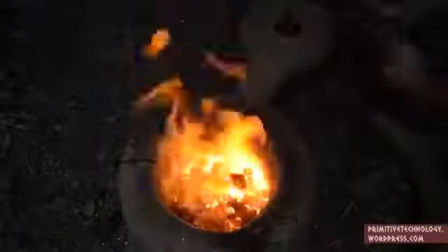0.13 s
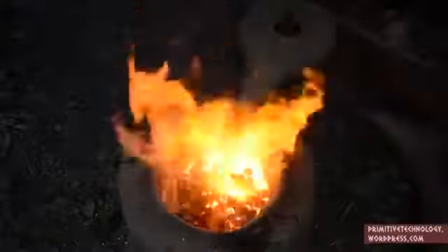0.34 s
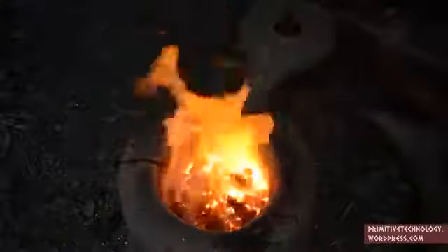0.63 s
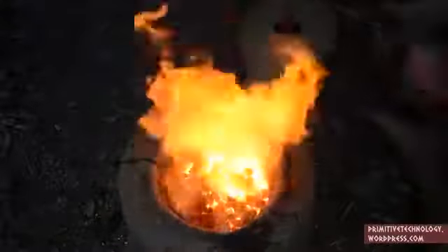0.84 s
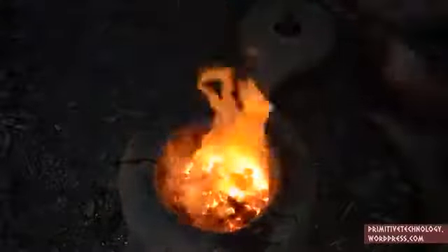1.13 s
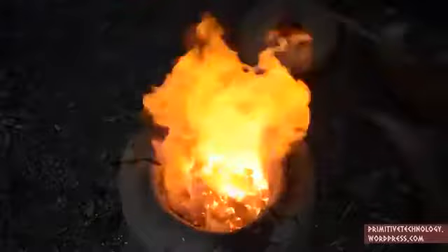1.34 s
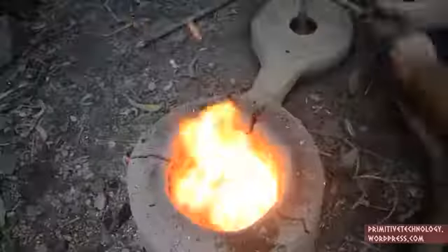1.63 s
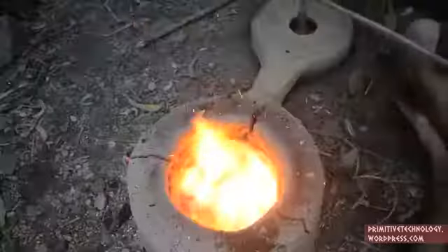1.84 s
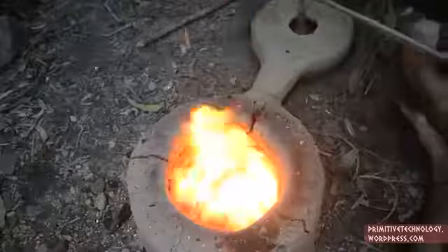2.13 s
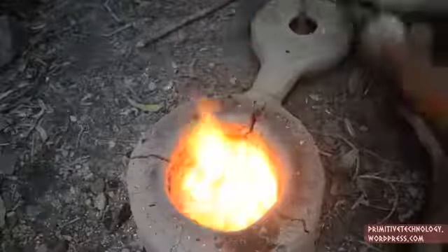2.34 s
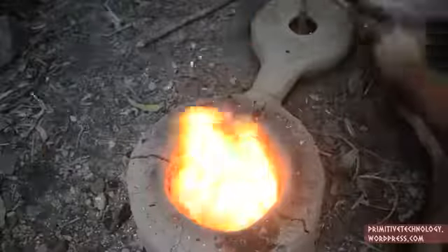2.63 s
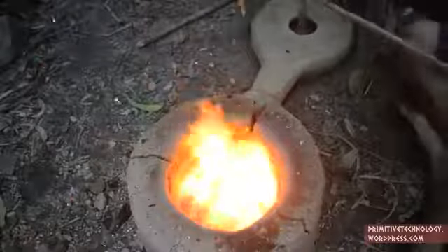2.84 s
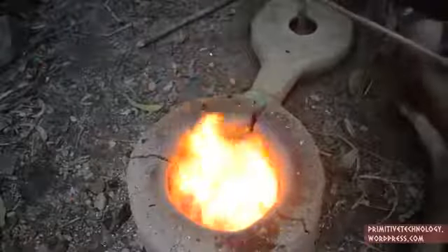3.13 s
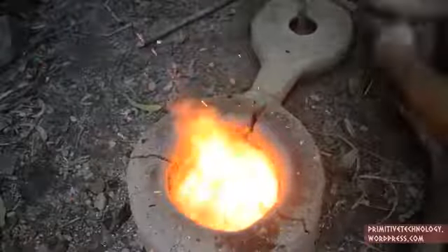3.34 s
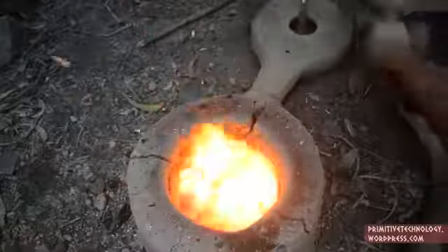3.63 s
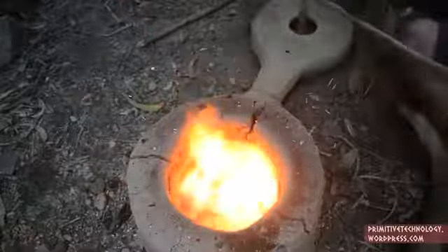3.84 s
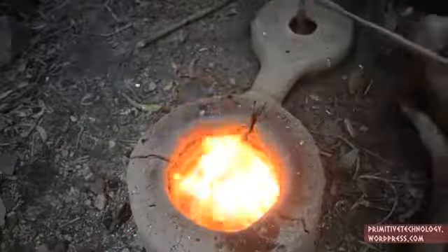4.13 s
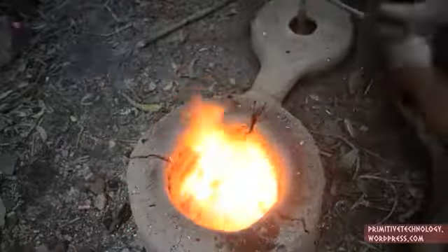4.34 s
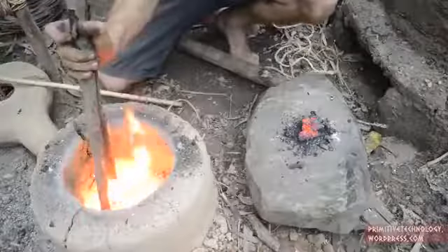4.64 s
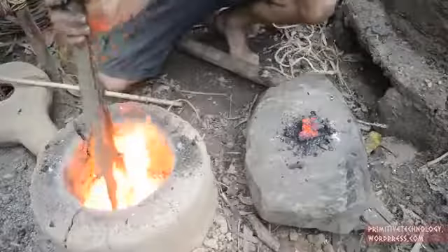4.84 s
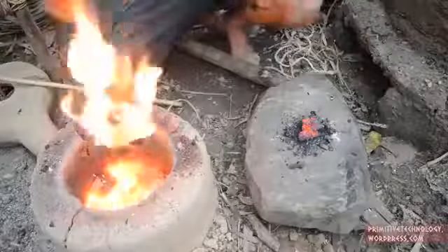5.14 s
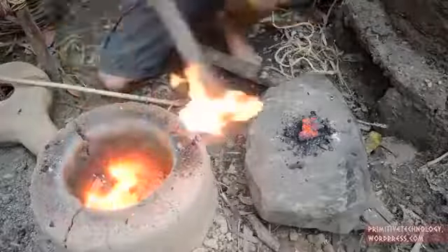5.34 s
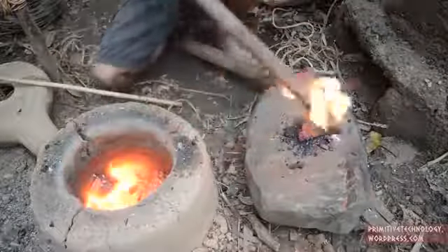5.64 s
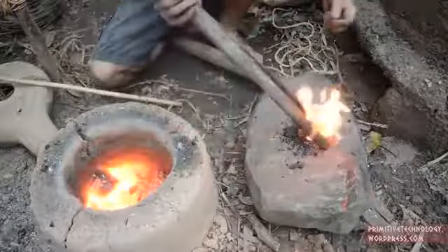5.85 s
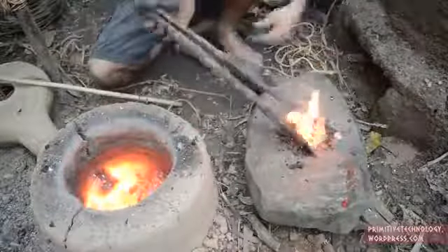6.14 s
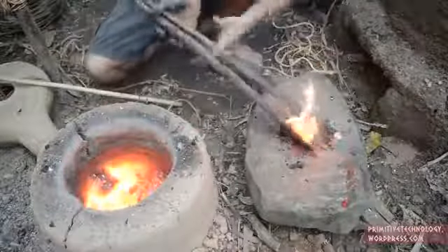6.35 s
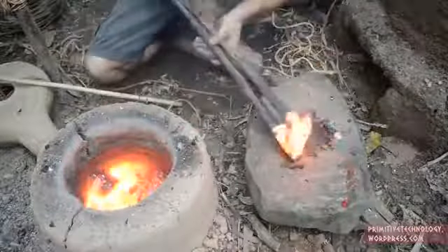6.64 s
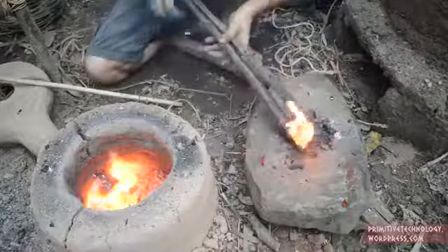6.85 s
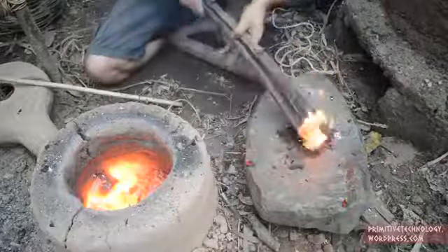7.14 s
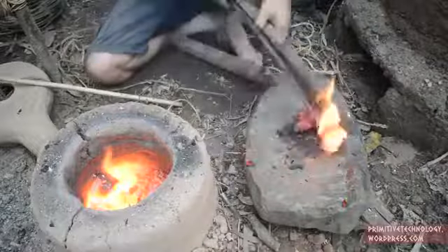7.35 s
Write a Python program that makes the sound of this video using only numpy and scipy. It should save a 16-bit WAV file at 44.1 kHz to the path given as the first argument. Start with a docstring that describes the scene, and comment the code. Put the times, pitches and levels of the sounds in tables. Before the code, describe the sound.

Low, fluttering gusts of furnace fire swell and drop with each back-and-forth stroke of a blower, its dry spindle rubbing, ticking and occasionally squeaking. The scene abruptly changes to a much quieter one: faint ember fizz and flame flutter, a sharp knock on stone, then glassy crackles and crunches as tongs work the lump. Faint open air lies beneath, with a short bird chirp at the end; close, dry outdoor sound.

```python
"""Outdoors, one microphone. From the start a bow spins the rotor of a clay blower back and forth: each stroke
swells shaped noise into the roar of a charcoal furnace, grit ringing the spindle makes rubs, scuffs and ticks,
and harmonic stacks make the cord squeak. At 4.626 s the scene changes: fizzing embers, and wooden tongs lift a
glowing lump onto a stone, with crunches of ringing fragments and knocks of decaying sines. Near the end a bird
chirps once, a gliding sine with echoes. Faint air noise lies under both scenes."""
import sys
import numpy as np
from scipy import signal
from scipy.fft import rfft, irfft
from scipy.io import wavfile
from scipy.ndimage import uniform_filter1d

SR = 44100
rng = np.random.default_rng(int(sys.argv[2]) if len(sys.argv) > 2 else 0)


def generate_wav(signal):
    """Clip the signal to [-1, 1] and save it as 16-bit WAV at the path in sys.argv[1]."""
    frames = np.transpose(np.atleast_2d(signal))
    scaled = np.clip(frames, -1, 1) * 32767
    pcm = np.round(scaled).astype(np.int16)
    wavfile.write(sys.argv[1], SR, pcm)


N = 330750
T = np.arange(N) / SR  # s


def gain_of(db):
    """Amplitude factor of a level in dB."""
    return 10 ** (np.asarray(db) / 20)


def evened(x):
    """Scales a sound to an RMS of one."""
    return x / np.sqrt(np.mean(x ** 2) + 1e-20)


def add(mix, s, sound):
    """Lays a sound into the mix at a time in seconds."""
    part = mix[round(s * SR):][:len(sound)]
    part += sound[:len(part)]


def coloured(x, points):
    """Gives a full-length sound a spectrum, silent outside its ends, and an RMS of one."""
    f, db = np.transpose(points)
    hz = np.fft.rfftfreq(N, 1 / SR)
    shape_db = np.interp(np.log(hz + 1), np.log(f), db, -100, -100)
    return evened(irfft(rfft(x) * gain_of(shape_db), N))


def lumpy_gain(lump_s, depth_db):
    """A gain that jumps about in lumps of about the given length."""
    size = round(lump_s * SR)
    smooth = uniform_filter1d(uniform_filter1d(rng.standard_normal(N), size), size)
    return gain_of(depth_db * evened(smooth))


def lumpy(lump_s, depth_db):
    """Noise whose level jumps about in lumps."""
    return rng.standard_normal(N) * lumpy_gain(lump_s, depth_db)


def grains(per_s, spread_db, share):
    """Noise mixed with a share of sparse clicks of uneven size."""
    size = np.minimum(rng.exponential(1, N), 2.5)
    struck = rng.random(N) < per_s / SR
    clicks = gain_of(spread_db * size) * rng.choice([-1, 1], N) * struck
    return share * evened(clicks) + (1 - share) * rng.standard_normal(N)


def chips(share, cycles):
    """Grit: plain noise plus small fragments, each ringing for a few cycles at its own pitch."""
    out, t, count = np.zeros(N + 300), T[:300], 16000
    at, pitch, size = rng.random((count, 3)).T
    hz = 1500 * 9.5 ** pitch[:, None]  # 1500 to 14250 Hz
    rings = np.sin(2 * np.pi * hz * t) * np.exp(-t * hz / cycles) * t * hz * hz / SR
    rings *= gain_of(6.6 * np.minimum(-np.log(1 - size), 2.5))[:, None]  # few big, many small
    np.add.at(out, (at * N).astype(int)[:, None] + np.arange(len(t)), rings)
    return share * evened(out[:N]) + (1 - share) * rng.standard_normal(N)


def resonate(x, hz, width):
    """A fixed resonance."""
    return signal.lfilter(*signal.iirpeak(hz, hz / width, SR), x)


def echoing(x, samples, first_db, t60):
    """Adds a scattered echo tail that dies by 60 dB in t60 seconds."""
    echoes = rng.standard_normal(samples) * gain_of(first_db - 60 * T[:samples] / t60)
    echoes[0] = 1  # the direct sound
    return signal.oaconvolve(x, echoes)


# the three colours of a scrape, treble, middle and low: from f/Hz, to f/Hz
COLOUR_BANDS = [(7570, 12550), (3580, 5550), (826, 2570)]
DRAG_S = 0.042  # the longer a scrape is against this, the less it sags


def scrapes(rows, grit, body, rise, tail_s, fade_db):
    """Each scrape builds up, lets grit ring the body in three colours, sags over its length and dies away."""
    drive = evened(grit)
    for hz, width, db in body:
        drive = drive + gain_of(db) * evened(resonate(grit, hz, width))
    powers, lead = np.zeros((3, N)), .008  # the build-up starts 8 ms ahead
    for s, length, *dbs in rows:
        t = np.arange(-lead, length + 0.072, 1 / SR)
        shape = np.exp(np.minimum(t, 0) / (rise * length + 0.0001))
        sag_db = fade_db * np.exp(-length / DRAG_S)
        shape *= gain_of(-sag_db * np.clip(t / length, 0, 1))
        shape *= 1 + 0.17 * np.exp(-abs(t) / 0.00055)  # the first contact snaps
        after = np.maximum(t - length, 0) / tail_s
        shape *= 1.11 * np.exp(-after) + 0.45 * np.exp(-after / 4.2)  # quick stop, then nearby reflections
        for power, db in zip(powers, dbs):
            add(power, s - lead, (gain_of(db) * shape) ** 2)
    out = np.zeros(N)
    for power, band in zip(powers, COLOUR_BANDS):
        colour = signal.sosfilt(signal.butter(2, band, "band", fs=SR, output="sos"), drive)
        out += np.sqrt(power) * evened(colour)
    return out


# spectrum of the open air at the place: f/Hz, relative level/dB per Hz
AIR_SPECTRUM = [(120, -33), (200, 6), (273, -9), (812, -14), (890, -7), (1590, -9), (4840, -5),
                (10600, -42), (14700, -31), (15500, -37)]
AIR_DB = -58.5


def open_air():
    """Steady noise with the colour of the outdoor air."""
    return gain_of(AIR_DB) * coloured(rng.standard_normal(N), AIR_SPECTRUM)


# glide of the bird's note: t/s, f/Hz, level/dB
CHIRP_GLIDE = [(7.395, 3450, -46), (7.399, 3200, -42), (7.405, 2920, -33.5), (7.412, 2720, -42)]


def bird():
    """One falling note, followed by its scattered echoes among the trees."""
    s, hz, db = np.transpose(CHIRP_GLIDE)
    t, out = np.arange(s[0], s[-1], 1 / SR), np.zeros(N)
    note = gain_of(np.interp(t, s, db)) * np.sin(2 * np.pi * np.cumsum(np.interp(t, s, hz)) / SR)
    note *= np.sqrt(2) * signal.windows.tukey(len(t), .2)  # sqrt(2): levels are RMS
    add(out, s[0], echoing(note, 6000, -28.5, 0.38))
    return out


# ember bed: t/s, fizz level/dB, flame flutter level/dB, charcoal rustle level/dB
EMBER_LEVELS = [(4.63, -44, -46, -43), (4.68, -51.5, -52.5, -54.5), (5.06, -51, -53.5, -57),
                (5.25, -59, -51.5, -58.5), (5.35, -50.5, -46.5, -51), (5.54, -53.5, -53.5, -56.5),
                (5.85, -49, -54, -50.5), (6.25, -52.5, -52, -58), (6.79, -49.5, -55, -52),
                (7.18, -61, -50, -53), (7.39, -44, -55.5, -50.5), (7.5, -54, -47, -43.5)]
# spectrum of the fizz: f/Hz, relative level/dB per Hz
FIZZ_SPECTRUM = [(1470, -49), (2500, -12), (3050, -9.5), (4640, -8), (7680, -4.5), (9370, -0.5),
                 (13200, -7.5), (15500, -32)]
# spectrum of the small flames: f/Hz, relative level/dB per Hz
FLUTTER_SPECTRUM = [(12, -45), (20, -15), (103, -1.5), (204, -7), (274, -6), (313, -10), (348, -9),
                    (700, -15.5), (910, -32), (1540, -120)]
# spectrum of the shifting charcoal: f/Hz, relative level/dB per Hz
RUSTLE_SPECTRUM = [(210, -30), (350, 2.5), (714, 5.5), (2460, -1), (2870, 0), (3430, -8), (6000, -1.5),
                   (7800, -11), (13200, -120)]


def embers():
    """Fine fizz with sparks, the low flutter of small flames, and loose charcoal shifting under the tongs."""
    s, *columns = np.transpose(EMBER_LEVELS)
    fizz = coloured(grains(400, 4.5, 0.47) * lumpy_gain(0.009, 1.7), FIZZ_SPECTRUM)
    flutter = coloured(lumpy(0.0089, 1.7), FLUTTER_SPECTRUM)
    rustle = coloured(grains(700, 3.7, 0.46) * lumpy_gain(0.0054, 3.0), RUSTLE_SPECTRUM)
    return sum(gain_of(np.interp(T, s, db)) * layer for db, layer in zip(columns, (fizz, flutter, rustle)))


# thin brief rings: t/s, f/Hz, level/dB at the start, t60/s
THIN_RINGS = [(5.411, 1680, -46, .12), (5.708, 13000, -43, .1)]


def pings():
    """Thin decaying sines."""
    out, t = np.zeros(N), T[:4000]
    for s, hz, db, t60 in THIN_RINGS:
        add(out, s, gain_of(db - 60 * t / t60) * np.sin(2 * np.pi * hz * t))
    return out


# slag and charcoal crunching under the tongs, levels before contouring:
# t/s, length/s, treble level/dB, middle level/dB
CRUNCH_EVENTS = [(4.676, 0.003, -36.5, -31.5), (4.731, .0023, -39.5, -54), (4.8, .013, -44.5, -54),
                 (4.822, 0.004, -36.5, -53), (4.837, 0.015, -43, -56), (4.86, .0059, -40.5, -56),
                 (4.932, .009, -41, -59), (5.115, .004, -47.5, -61), (5.221, .0032, -44.5, -60),
                 (5.365, .0083, -44, -52), (5.398, 0.016, -43, -47), (5.51, .049, -50, -62),
                 (5.56, .03, -47, -56), (5.707, .0042, -36.5, -44.5), (5.831, 0.0093, -29, -28.5),
                 (5.834, .004, -19, -23), (5.84, .017, -51, -40), (5.945, .0081, -41, -54),
                 (6.034, 0.012, -32, -32.5), (6.055, 0.013, -41, -38), (6.079, .005, -45, -44),
                 (6.137, 0.019, -41, -41.5), (6.182, .012, -45, -47), (6.195, 0.024, -49, -44),
                 (6.225, 0.0092, -46, -46), (6.244, .0047, -38.5, -59), (6.29, 0.0064, -60, -50),
                 (6.356, 0.028, -41, -36.5), (6.377, 0.013, -34.5, -32), (6.395, 0.05, -47, -44),
                 (6.43, 0.006, -37, -34), (6.488, 0.015, -48, -42), (6.515, .0091, -51, -46),
                 (6.559, 0.016, -44, -37.5), (6.588, 0.0039, -27, -31), (6.605, 0.018, -32, -26.5),
                 (6.614, .0061, -31, -26), (6.636, .0089, -40, -36), (6.719, 0.0045, -32, -30),
                 (6.741, 0.018, -39, -40.5), (6.78, .003, -42, -37), (6.795, 0.017, -37, -35.5),
                 (6.873, 0.0047, -62, -44), (6.916, .024, -45, -43), (6.94, 0.012, -41.5, -41),
                 (6.966, 0.024, -52, -47.5), (6.99, 0.029, -47, -43.5), (7.016, .0065, -40.5, -39),
                 (7.073, .0072, -54, -49.5), (7.107, 0.14, -51, -52.5), (7.235, .023, -52, -45),
                 (7.259, 0.02, -47, -39), (7.283, .02, -39.5, -38), (7.425, .035, -51, -47),
                 (7.478, .016, -44, -48)]
# what the brittle lump rings with: f/Hz, width/Hz, level/dB against the plain grit
LUMP_RINGS = [(2270, 270, -42), (3270, 460, -1.5), (4170, 900, -1.5), (5070, 630, -18), (6560, 2100, 5.5),
              (7870, 460, -19), (9260, 1200, -2)]
CRUNCH_LOW_DB = -6.5  # low colour against the middle


def crunches():
    """Breaking fragments ring the brittle lump in short scrapes."""
    rows = [(*row, row[-1] + CRUNCH_LOW_DB) for row in CRUNCH_EVENTS]
    return scrapes(rows, chips(0.46, 10.2), LUMP_RINGS, rise=0.08, tail_s=0.0037, fade_db=8.4)


# ring of the lump set on stone: f/Hz, relative level/dB, t60/s
STONE_RINGS = [(422, 0.5, 0.038), (540, 1, 0.037), (870, -38, 0.011), (1110, 5, 0.039), (1450, 3.5, .03),
               (1920, 3, .03), (2120, 5, 0.048), (2730, -19, .04)]
# knocks on the stone: t/s, level/dB added to every ring
KNOCK_EVENTS = [(5.833, -31), (6.59, -47), (6.606, -54), (6.796, -41.5), (7.447, -42)]


def knocks():
    """The lump meets the stone and rings briefly in decaying modes."""
    out, t = np.zeros(N), T[:4000]
    ring = sum(gain_of(db - 60 * t / t60) * np.sin(2 * np.pi * hz * t) for hz, db, t60 in STONE_RINGS)
    ring *= np.minimum(t / 0.00067, 1)  # soft contact
    for s, db in KNOCK_EVENTS:
        add(out, s, gain_of(db) * ring)
    return out


# squeaks of the slipping cord, f and level before rasp and fades:
# t/s, length/s, start f/Hz, end f/Hz, level/dB, tilt/dB per harmonic up to the third
SQUEAK_EVENTS = [(0.135, 0.043, 753, 808, -31, -8.5), (1.124, 0.027, 1160, 1180, -35, -5),
                 (1.135, 0.023, 780, 783, -32.5, -9), (1.15, 0.026, 1226, 1253, -27.5, -5.5),
                 (2.594, 0.043, 1140, 1200, -28, 9), (2.63, 0.018, 810, 876, -27, -2),
                 (2.636, 0.03, 1020, 1060, -37, -12), (3.088, 0.023, 1160, 1100, -24.5, 15),
                 (3.114, .016, 836, 784, -30, 9), (3.124, 0.024, 742, 916, -30, 12),
                 (3.82, .012, 1190, 1155, -22, -9), (4.073, 0.061, 787, 884, -41, 5),
                 (4.128, .04, 1680, 1880, -38, -12)]
# colour of a squeak as the microphone hears it: f/Hz, level/dB
SQUEAK_COLOUR = [(700, 3), (1250, -4), (2450, 3), (3600, -2.5), (5500, -7.5), (7500, -6), (10000, -3),
                 (12500, -15)]


def squeaks():
    """Stick-slip pulses: an unsteady, raspy harmonic stack coloured by the microphone, with a short echo tail."""
    out, k = np.zeros(N), np.arange(1, 13)[:, None]  # harmonic numbers
    colour_hz, level_db = np.transpose(SQUEAK_COLOUR)
    for s, length, start_hz, end_hz, db, tilt_db in SQUEAK_EVENTS:
        n = round(length * SR)
        wobble, rasp = uniform_filter1d(rng.standard_normal((2, SR // 10)), 90)[:, :n]
        hz = np.linspace(start_hz, end_hz, n) * (1 + .035 * wobble)
        harmonic_db = tilt_db * np.minimum(k - 1, 2) + np.interp(k * hz, colour_hz, level_db, right=-60)
        phase = 2 * np.pi * k * np.cumsum(hz) / SR + k * k
        stack = (gain_of(harmonic_db) * np.cos(phase)).sum(0)
        add(out, s, gain_of(db + 15 * rasp) * evened(stack) * signal.windows.tukey(n, .7))
    return echoing(out, 4000, -31, 0.13)[:N]


# scuffs and ticks of cord and spindle, levels before contouring: t/s, length/s, treble level/dB, low level/dB
SCUFF_EVENTS = [(0.058, .022, -42, -63), (0.083, 0.0052, -33, -61), (0.117, 0.044, -27, -37),
                (0.282, 0.0072, -58, -46), (0.337, 0.013, -37, -52), (0.393, 0.029, -43, -59),
                (0.437, .021, -37, -43), (0.462, .0044, -30, -44), (0.501, .004, -33, -36),
                (.585, 0.0045, -42, -50), (0.599, 0.047, -32, -43), (.647, .0061, -26, -40),
                (0.775, 0.0074, -34.5, -50), (0.849, 0.019, -42, -33.5), (0.895, 0.0072, -41, -41),
                (0.973, 0.033, -41, -39), (1.093, 0.0063, -44, -62), (1.122, 0.053, -33.5, -49),
                (1.26, .038, -48, -60), (1.294, 0.0091, -43, -46), (1.612, 0.038, -32, -41.5),
                (1.659, 0.0084, -29, -41), (1.73, .008, -39, -48), (1.777, .006, -38, -50),
                (1.924, 0.048, -46.5, -41.5), (1.976, 0.0057, -33.5, -40), (2.018, 0.038, -30.5, -43),
                (2.075, .005, -44, -59), (2.198, .008, -41, -34), (2.25, 0.0057, -29, -28),
                (2.292, 0.0051, -34, -26.5), (2.434, 0.0065, -41, -35), (2.553, 0.0064, -49, -46),
                (2.572, 0.0078, -20.5, -37), (2.595, 0.047, -25, -34), (2.685, .01, -35.5, -52),
                (2.798, 0.0036, -20, -22), (2.833, 0.0035, -30, -37), (2.877, .036, -43, -41),
                (3.016, .0033, -32, -24.5), (3.05, 0.013, -30.5, -46), (3.071, 0.016, -33.5, -40),
                (3.09, .022, -25.5, -42), (3.118, 0.031, -31, -41), (3.179, 0.013, -47, -37),
                (3.245, 0.0085, -27.5, -25.5), (3.294, 0.0045, -17.5, -17), (3.334, .0026, -13.5, -20),
                (3.353, 0.026, -26.5, -39), (3.374, .011, -35, -25.5), (3.58, 0.026, -31, -39.5),
                (3.63, 0.031, -30.5, -40), (3.82, 0.0036, -28.5, -21.5), (3.886, .0024, -32, -29),
                (3.93, 0.0049, -27.5, -32), (3.966, .005, -30, -33), (3.983, 0.0028, -17, -32),
                (4.037, 0.0034, -36, -45), (4.067, 0.04, -29.5, -41), (4.128, 0.034, -30, -46),
                (4.263, 0.01, -34, -31.5), (4.309, 0.013, -45, -28), (4.35, .0047, -19, -30),
                (4.391, 0.012, -26.5, -32), (4.421, 0.0043, -30, -41), (4.458, 0.0044, -38, -38),
                (4.509, .004, -46, -26), (4.53, .005, -32.5, -40), (4.557, 0.013, -38, -54),
                (4.607, 0.017, -31.5, -40.5)]
# what cord, spindle and clay ring with when scuffed: f/Hz, width/Hz, level/dB against the plain grit
SPINDLE_RINGS = [(1146, 106, -12.5), (2370, 130, -16.5), (3410, 560, -13.5), (4400, 120, -21),
                 (6680, 1900, -5), (10000, 1600, -5), (12300, 1500, -23)]
SCUFF_MIDDLE, SCUFF_MIDDLE_DB = 0.57, -2  # middle lies between treble (0) and low (1), a little down


def scuffs():
    """Grit rings cord, spindle and clay in short scrapes."""
    rows = []
    for s, length, treble, low in SCUFF_EVENTS:
        middle = treble + SCUFF_MIDDLE * (low - treble) + SCUFF_MIDDLE_DB
        rows.append((s, length, treble, middle, low))
    return scrapes(rows, chips(0.38, 7.3), SPINDLE_RINGS, rise=0.032, tail_s=0.0034, fade_db=6.3)


# bow strokes, before the inertia rounds them: reversal t/s, full blast t/s, let-go t/s,
# roar level/dB at reversal, full blast and let-go, then at full blast rumble, rub and air jet level/dB
BOW_STROKES = [(-.3, -0.16, 0.084, -45, -18.5, -23.5, -24.5, -57, -36.5),
               (.22, 0.351, 0.65, -50.5, -14.5, -27.5, -23.5, -38.5, -29),
               (0.731, 0.851, 1.087, -47.5, -14, -23, -22, -37, -26.5),
               (1.225, 1.372, 1.68, -53, -14.5, -27, -23.5, -38.5, -28),
               (1.681, 1.783, 2.0, -44.5, -13, -19.5, -19.5, -36.5, -34),
               (2.16, 2.312, 2.572, -42, -15, -24, -20, -34.5, -35.5),
               (2.691, 2.796, 3.08, -45, -14.5, -23, -20, -30.5, -32.5),
               (3.208, 3.31, 3.6, -42.5, -14.5, -24.5, -20.5, -30.5, -31),
               (3.718, 3.827, 4.07, -44, -14, -21, -21, -33, -31.5),
               (4.237, 4.354, 4.6, -45, -15.5, -26, -21, -29, -36)]
# where the final stroke ends: t/s, roar level/dB
FINAL_REVERSAL = (4.72, -33)
RISE_BEND, SAG_BEND, STOP_BEND = 0.63, 2.53, 0.97  # roar leaps up, sags while the bow runs out, then stops
INERTIA_S = 0.048  # the rotor rounds off every corner
RUMBLE_FOLLOW = 0.73  # dB of rumble per dB of roar
RUB_IDLE_DB, RUB_SLACK_DB, RUB_BEND = -45, -48.5, 1.5  # rub at the reversal and when the cord goes slack
JET_RISE_FOLLOW, JET_FOLLOW = 0.96, 1.58  # dB of jet per dB of roar: while the blast builds, then after
JET_LAG_S, JET_IDLE_DB = 0.0065, -59
JET_TOP_DB, JET_TOP_FOLLOW = -3, 0.27  # jet top against its body at full blast; extra dB per dB of jet


def pumping():
    """Levels in dB of roar, rumble, rub, jet and the jet's top: one shape for every stroke."""
    start, full, let_go, idle, top, spent, rumble_db, rub_db, jet_db = np.transpose(BOW_STROKES)
    k = np.searchsorted(start, T, "right") - 1  # current stroke
    end = np.append(start[1:], FINAL_REVERSAL[0])[k]
    end_db = np.append(idle[1:], FINAL_REVERSAL[1])[k]
    rise, sag, stop = (np.clip((T - a) / (b - a), 0, 1)
                       for a, b in ((start[k], full[k]), (full[k], let_go[k]), (let_go[k], end)))
    roar = idle[k] + (top - idle)[k] * rise ** RISE_BEND + (spent - top)[k] * sag ** SAG_BEND
    roar += (end_db - spent[k]) * stop ** STOP_BEND
    rumble = rumble_db[k] + RUMBLE_FOLLOW * (roar - top[k])
    rub = RUB_IDLE_DB + (rub_db[k] - RUB_IDLE_DB) * rise + (RUB_SLACK_DB - rub_db[k]) * sag ** RUB_BEND
    rub += (RUB_IDLE_DB - RUB_SLACK_DB) * stop
    follow = np.where(rise < 1, JET_RISE_FOLLOW, JET_FOLLOW)
    jet = np.maximum(jet_db[k] + follow * (roar - top[k]), JET_IDLE_DB)
    jet_top = JET_TOP_DB + JET_TOP_FOLLOW * (jet - jet_db[k])
    lagging = [np.interp(T - JET_LAG_S, T, db) for db in (jet, jet_top)]
    return uniform_filter1d([roar, rumble, rub, *lagging], round(INERTIA_S * SR), mode="nearest")


# spectrum of nozzle and shaft: f/Hz, relative level/dB per Hz
ROAR_SPECTRUM = [(140, -35), (240, -17), (264, -21.5), (355, -3), (390, -2), (417, 1.5), (517, -5.5),
                 (592, -11.5), (785, -13), (1060, -19.5), (1520, -21), (2530, -29.5), (2940, -28.5),
                 (6000, -48.5), (7800, -56), (13200, -120)]
# second ring of the furnace shaft: f/Hz, width/Hz, switch t/s (the start), unused level/dB before it,
# level/dB against the roar from then on
SHAFT_RING = (787, 103, 0, -32, -13)
# spectrum of the furnace rumble: f/Hz, relative level/dB per Hz
RUMBLE_SPECTRUM = [(12, -67), (20, -36), (43, -22), (92, -4), (145, -0.5), (188, -5.5), (217, -2.5),
                   (247, -21.5), (270, -4.5), (350, -22), (590, -120)]
# spectrum of the rubbing spindle: f/Hz, relative level/dB per Hz
RUB_SPECTRUM = [(1470, -6), (2500, 1.5), (3290, -2), (4270, -0.5), (4570, -0.5), (6740, 0), (10200, 4.5),
                (14500, -9), (15500, -32)]
ROAR_SPLIT_HZ, JET_SPLIT_HZ = 1100, 1900  # roar below, jet body between, jet top above


def furnace():
    """Turbulent burning comes in pops and lumps that roar and jet share; rumble and spindle rub join in."""
    roar_db, rumble_db, rub_db, jet_db, top_db = pumping()
    burning = coloured(grains(260, 3.7, 0.37) * lumpy_gain(0.0082, 0.61), ROAR_SPECTRUM)
    roar, below_top = (signal.sosfiltfilt(signal.butter(3, edge, fs=SR, output="sos"), burning)
                       for edge in (ROAR_SPLIT_HZ, JET_SPLIT_HZ))
    hz, width, _, _, ring_db = SHAFT_RING
    ring = evened(resonate(resonate(lumpy(0.0034, 1.0), hz, width), hz, 2 * width))
    rumble = coloured(lumpy(0.012, 2.14), RUMBLE_SPECTRUM)
    rub = coloured(grains(1000, 11.0, 0.42) * lumpy_gain(0.0079, 2.32), RUB_SPECTRUM)
    fire = gain_of(roar_db) * (roar + gain_of(ring_db) * ring) + gain_of(rumble_db) * rumble
    jet_body, jet_top = below_top - roar, burning - below_top
    jet = (jet_body + gain_of(top_db) * jet_top) / np.std(burning - roar)
    return fire + gain_of(jet_db) * jet + gain_of(rub_db) * rub


CHANGE_S = 4.626  # the blower scene gives way to the tongs and stone, over the 2 ms before this


def scene():
    """The blower first, then the lump on the stone, with the same air under both."""
    before = np.clip((CHANGE_S - T) / .002, 0, 1)
    blower = furnace() + scuffs() + squeaks()
    forge = embers() + crunches() + knocks() + pings() + bird()
    return (before * blower + (1 - before) * forge + open_air())[None]


def record(dry):
    """One microphone: the loudest ticks are rounded off near full scale; then the band limit."""
    rounded = 1.2 * np.tanh(dry / 1.2)
    lowpass = signal.firwin(201, 15380, window=("kaiser", 10), fs=SR)  # edge in Hz
    return signal.oaconvolve(rounded, lowpass[None], "same")


dry = scene()
out = record(dry)
generate_wav(out)
```